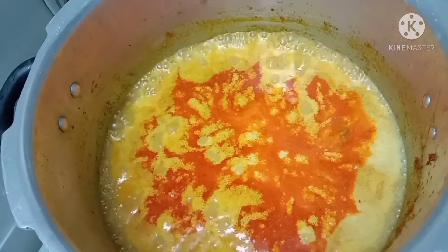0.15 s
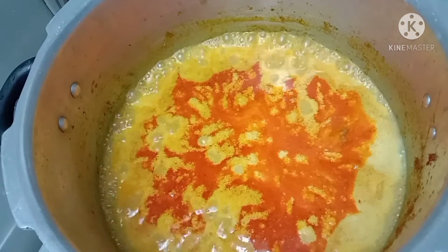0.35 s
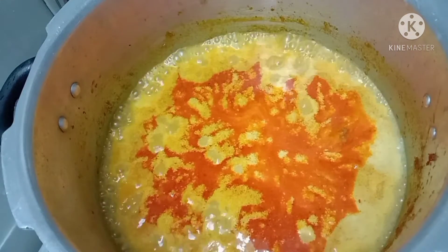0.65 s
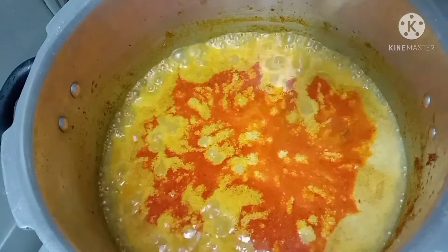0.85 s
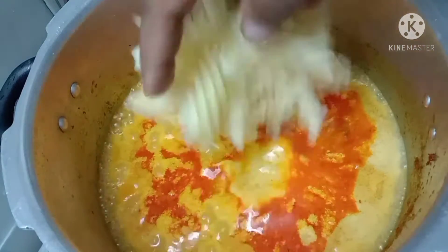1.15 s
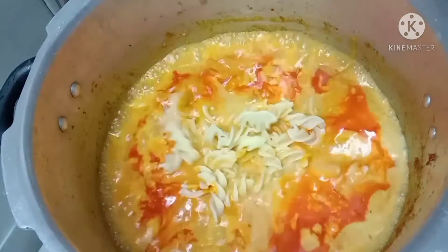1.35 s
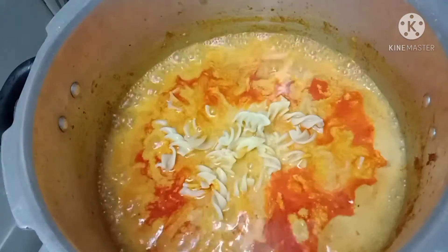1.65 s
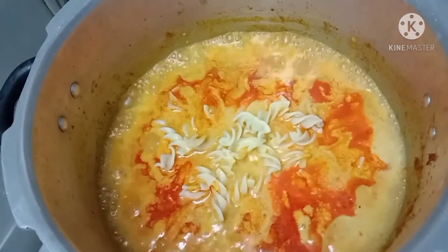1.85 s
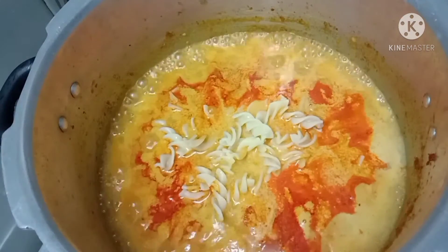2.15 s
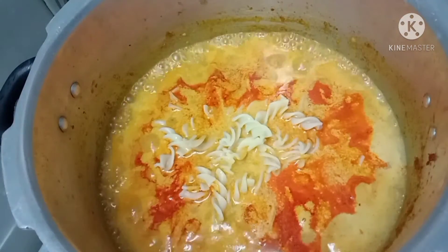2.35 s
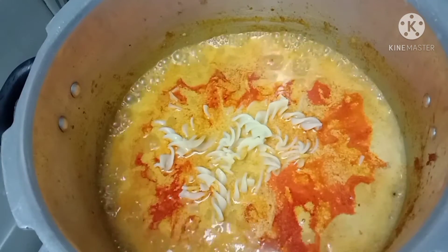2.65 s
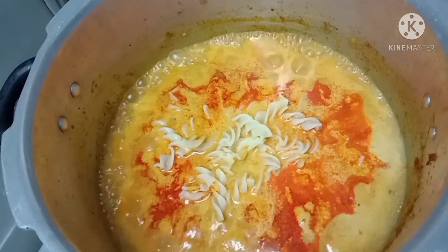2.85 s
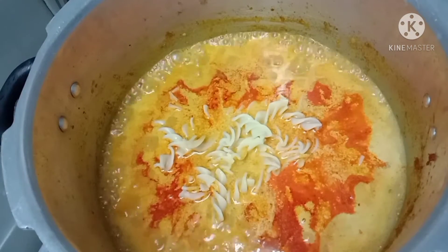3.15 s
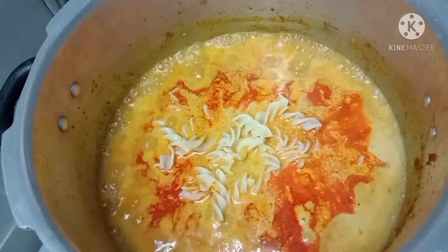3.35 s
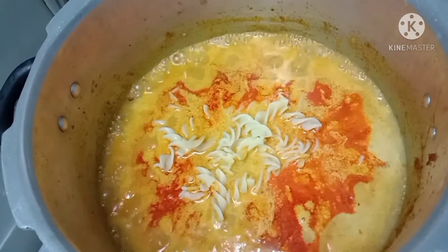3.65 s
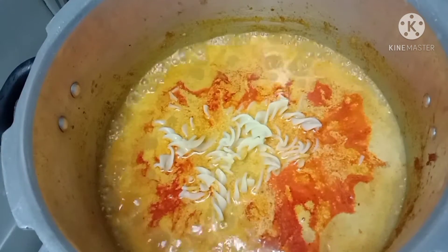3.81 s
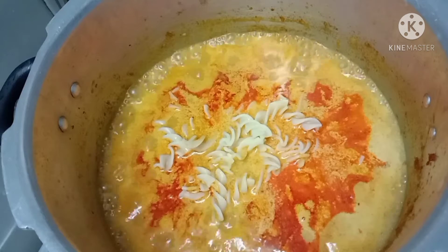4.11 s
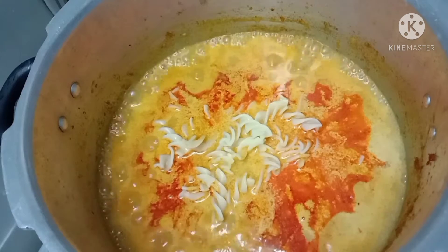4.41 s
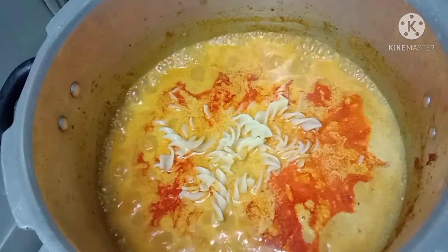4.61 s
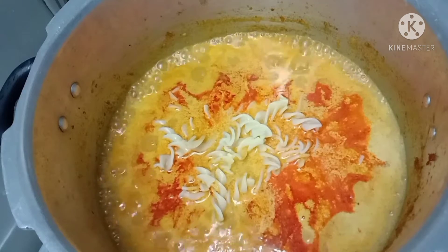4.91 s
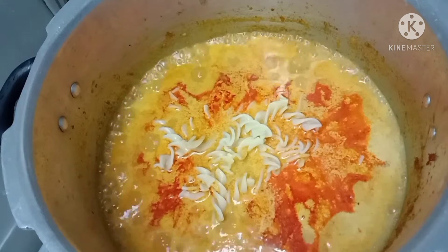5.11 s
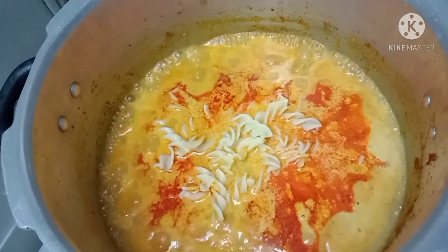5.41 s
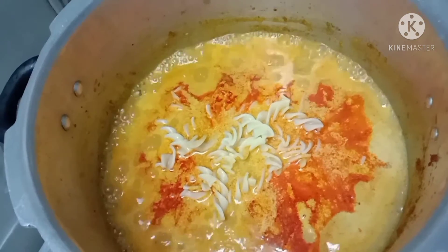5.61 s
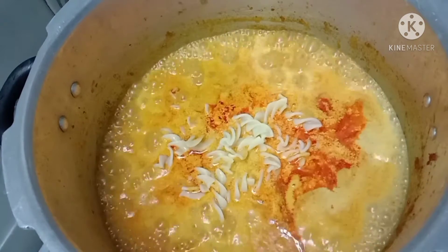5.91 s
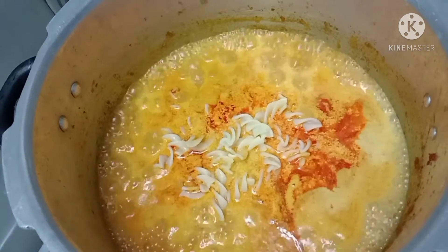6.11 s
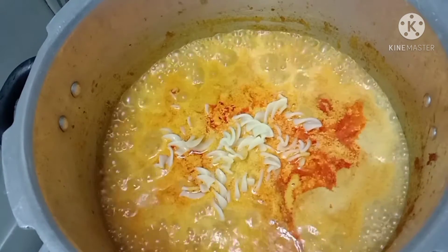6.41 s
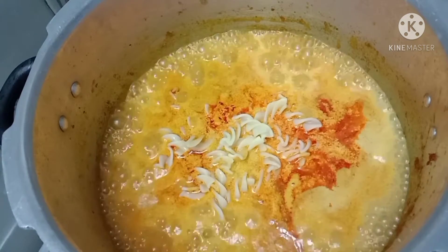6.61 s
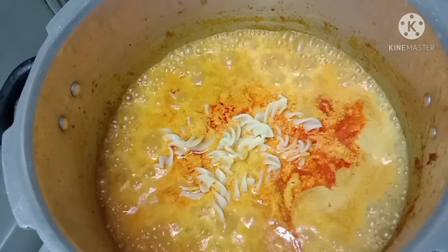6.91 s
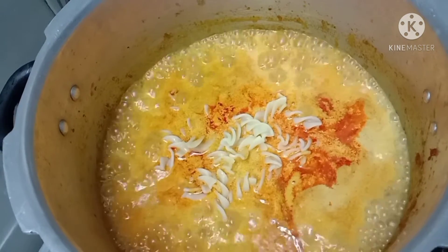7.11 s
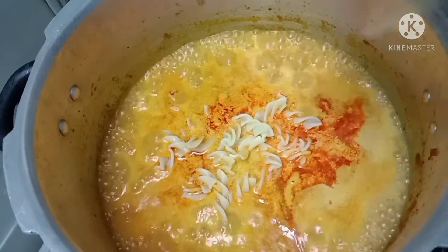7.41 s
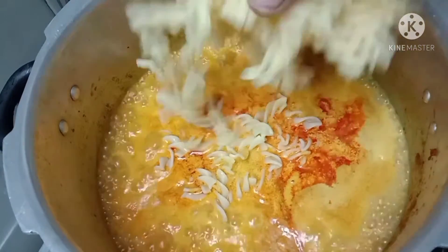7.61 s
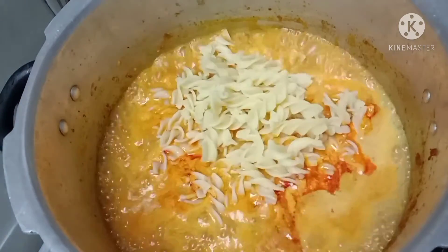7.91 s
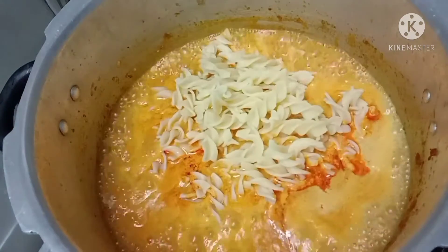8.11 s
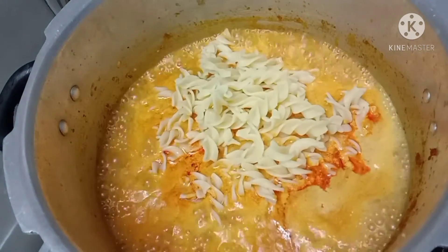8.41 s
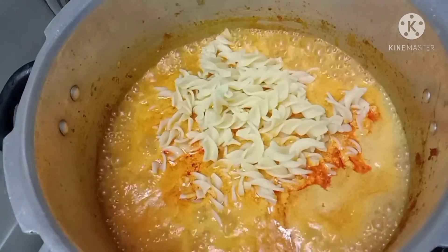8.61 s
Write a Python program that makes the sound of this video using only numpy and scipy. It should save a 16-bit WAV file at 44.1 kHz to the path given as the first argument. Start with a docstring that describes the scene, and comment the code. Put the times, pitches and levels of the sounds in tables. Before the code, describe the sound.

Quiet bubbling gravy in a metal pot, a wet pasta splash, a burst of hard metallic clanks, scraping, then another sharp plop and softer squelches.

```python
"""Pasta into simmering gravy

Thick gravy simmers in an open pressure cooker in a small kitchen: noise and random clicks through
resonances make the froth fizz and the bubbles gurgle; short soft tones make glugs and low thumps.
Cooked pasta is scraped from a vessel by tiny slips and lands in shaped noise: splashes, slops and smacks.
The vessel clanks and knocks against the cooker as decaying modes, and the hard walls answer."""
import sys
import numpy as np
from scipy import signal
from scipy.fft import rfft, irfft, next_fast_len
from scipy.io import wavfile
from scipy.ndimage import uniform_filter1d, map_coordinates

SR = 44100
rng = np.random.default_rng(int(sys.argv[2]) if len(sys.argv) > 2 else 0)


def waveform_to_disk(signal):
    """Save audio, clipped to [-1, 1], as 16-bit WAV at the path in sys.argv[1]."""
    frames = np.transpose(np.atleast_2d(signal))
    scaled = np.clip(frames, -1, 1) * 32767
    samples = np.round(scaled).astype(np.int16)
    wavfile.write(sys.argv[1], SR, samples)


N = 385875

# Levels are relative; each sound sets its own reference.
# Every width is that of one of two poles in a row, before the sound's own "broaden" factor.
# strength of the boil, in two stretches: time_s, level_db
BOIL_STRENGTH = [
    [(0.0, -66), (0.66, -66.5), (0.86, -67), (2.67, -65.5), (3.16, -68.5), (3.52, -67), (4.3, -66)],
    [(4.95, -66.5), (5.34, -58), (5.5, -63.5), (7.02, -66.5), (7.15, -63.5), (8.33, -67), (8.75, -71.5)],
]
# surges of bubbling under the rim: start_s, length_s, gurgle_db, hiss_db
BUBBLING_SURGES = [(.2, 0.22, -73, -66.5), (1.16, 0.28, -69.5, -71.5), (1.56, 0.078, -62.5, -80),
                   (1.81, 0.048, -72, -86), (2.08, 0.19, -78, -74), (2.21, 0.24, -67.5, -83),
                   (2.6, 0.11, -72, -64.5), (2.88, 0.14, -73, -99), (3.33, 0.05, -63, -78),
                   (3.72, 0.25, -72, -99), (4.76, 0.25, -70.5, -81), (5.52, 0.24, -72.5, -93),
                   (5.83, 0.084, -74, -97), (6.08, 0.38, -70.5, -85), (6.59, 0.38, -69, -98)]
SURGE_ATTACK_S, SURGE_RELEASE_S = 0.054, 0.041
# colour of the fizzing froth: frequency_hz, level_db
FROTH_COLOUR = [(2820, -38.5), (4800, -22), (5070, -18.5), (5530, -2.5), (5990, -11.5), (7650, 0.5),
                (8520, -4), (9400, -15), (11500, -13.5), (12700, -5.5), (13400, -6.5), (14900, -3),
                (15500, -6.5)]
# resonances of the air above the gravy: frequency_hz, width_hz, level_db
AIR_CAVITY = [(806.5, 13, 9), (1172, 62, 15.5), (1716, 27, 3), (2187, 150, -0.5), (2873, 26, -22.5),
              (3500, 100, -24), (3910, 24, -17), (4503, 100, -14.5), (4800, 27, -24.5), (5450, 1000, -24.5)]
# resonances of small bubbles bursting at random: frequency_hz, width_hz, level_db
CRACKLE_MODES = [(781, 49, -9), (1189, 67, 3.5), (1390, 120, -5.5), (1672, 50, -3), (2260, 380, -11.5)]
# colour of many small bubbles: frequency_hz, level_db
BUBBLE_COLOUR = [(400, -39), (750, -14), (1200, -3.5), (1700, -6), (1950, -13), (2300, -8.5), (3200, -11.5),
                 (4500, -16), (5000, -28), (5600, -14), (7000, -3.5), (10000, -42)]
# colour of the low boil, also used for squishing pasta: frequency_hz, level_db
RUMBLE_COLOUR = [(24, -47), (40, -17), (172, 0), (324, -2), (713, -10), (781, -14), (1060, -7.5),
                 (1160, -12), (1500, -10.5), (1950, -31), (3300, -120)]
# steady layers, relative to the boil
HOLLOW_DB, BRIGHT_DB, GURGLE_DB, CRACKLE_DB = -13, -12, -4, -14
LUMPY_DB, LUMPY_KNOTS_PER_S = 7.5, 17  # the hollow layer comes in uneven bursts
FLUTTER_DB, FLUTTER_KNOTS_PER_S = 1.4, 48  # the level of the fizz flutters slightly at random

# big bubbles bursting at the surface: start_s, level_db, centre_hz
BUBBLE_POPS = [(0.301, -58, 1420), (1.161, -58.5, 1110), (1.27, -54, 1200), (1.322, -54, 1220),
               (1.42, -71, 1270), (2.135, -56, 1390), (2.275, -55, 1250), (2.895, -57.5, 1800),
               (3.0, -68, 1590), (4.924, -51.5, 1348), (5.23, -50, 1400), (5.298, -48, 1480),
               (6.345, -39, 1220), (7.945, -64, 1870)]
POP_T60_S, POP_RISE_S, POP_WIDTH = 0.055, 0.0076, 0.26  # width is a share of the centre frequency

# sharp wet smacks: start_s, peak_db, centre_hz, t60_s
WET_SMACKS = [(.408, -39.5, 7960, 0.047), (.631, -47, 4800, 0.065), (.6497, -22, 5160, 0.06),
              (0.6759, -19, 5640, 0.015), (0.6952, -25.5, 3530, 0.056), (0.706, -33, 6000, 0.011),
              (0.798, -43, 5030, 0.023), (5.7521, -40.5, 7680, 0.014), (6.3447, -14, 2922, 0.028),
              (7.006, -34, 8150, 0.0181), (7.0479, -29.5, 6100, 0.024), (7.06, -39.5, 4680, 0.012),
              (7.129, -34.5, 5330, 0.033), (7.161, -27.5, 5530, 0.012)]
# the pot's walls colour smacks and spray: frequency_hz, level_db
POT_COLOUR = [(1300, 4.5), (1600, 15.5), (1930, -2.5), (2250, 2.5), (2550, -15), (2750, 0), (2950, -6.5),
              (3350, 3.5), (3780, -6.5), (4100, 1), (4700, 3.5), (5030, -0.5), (5700, -1.5), (8000, 4.5),
              (9300, -7.5), (11500, -5.5), (13000, 4.5)]

# spray thrown up by the pasta: start_s, level_db, rise_s, lowest_hz
PASTA_SPRAYS = [(0.635, -43.5, 0.015, 3810), (.651, -37, 0.024, 2480), (0.727, -54, 0.031, 3600),
                (6.35, -52, 0.055, 3000), (6.442, -45, 0.023, 900), (7.005, -55, 0.018, 3500),
                (7.038, -47, 0.021, 2160), (7.125, -48, 0.019, 3660), (7.148, -45.5, 0.013, 2660),
                (7.72, -62.5, 0.049, 2986)]
# colour of the fine droplets: frequency_hz, level_db
SPRAY_COLOUR = [(470, -53.5), (800, -40), (1230, -17), (2200, 6.5), (3400, 0), (6920, -5.5), (9090, -10.5),
                (15500, -15.5)]
# lumps of pasta sinking in: start_s, rise_s (of the slop), slop_db, squelch_db, squelch_hz
PASTA_LANDINGS = [(.662, 0.039, -66, -56, 1400), (2.64, 0.039, -59.5, -65, 840),
                  (6.345, 0.031, -45.5, -57, 1250), (6.445, 0.032, -52, -43.5, 1164),
                  (6.505, 0.031, -53, -66, 1100), (6.64, 0.042, -63.5, -77, 1170),
                  (7.02, 0.041, -65.5, -56, 1060), (7.219, 0.028, -51.5, -57, 1115),
                  (7.578, 0.019, -60, -59, 1240), (7.625, 0.028, -54, -60, 2270),
                  (8.472, 0.033, -62, -42.5, 1210), (8.52, 0.027, -63, -53.5, 790)]
SLOP_HZ = 259  # centre of the dull push of displaced gravy
SQUELCH_WIDTH, SQUELCH_RISE = 0.34, 0.77  # shares of the squelch frequency and of the slop's rise time
# every clank jolts the gravy: level relative to the clank, and at most
JOLT_DB, JOLT_MAX_DB, JOLT_RISE_S, JOLT_HZ = -21.5, -43.5, 0.01, 415

# short soft tones, singly or in runs: glugs, low thumps and the falling notes of a scrape:
# start_s, pitch_hz (before gliding), level_db, rise_s, swell_count
SOFT_TONES = [(.685, 163, -57, 0.049, 1), (.738, 285, -50.5, 0.032, 1), (.805, 239, -55.5, 0.017, 1),
              (.96, 385, -64.5, 0.06, 1), (1.02, 439, -55.5, 0.025, 1), (1.085, 423, -56.5, 0.026, 1),
              (1.175, 409, -57.5, 0.05, 2), (1.3, 1565, -62.5, 0.043, 1), (1.345, 367, -50, 0.015, 1),
              (1.455, 804, -66, .03, 1), (1.541, 399, -55, 0.029, 1), (2.604, 219, -40.5, 0.012, 1),
              (2.646, 220, -38, 0.011, 1), (2.685, 211, -55.5, 0.026, 2), (2.9575, 1180, -53.5, 0.0045, 1),
              (3.281, 420.3, -48, 0.024, 1), (3.343, 433.7, -46.5, 0.026, 2), (3.5, 256.5, -64, 0.048, 1),
              (3.68, 427, -64, 0.042, 1), (3.75, 435, -52, 0.021, 2), (3.932, 1160, -56, 0.012, 1),
              (4.371, 390, -28.5, 0.0051, 1), (4.372, 222, -41, 0.014, 1), (4.554, 165.5, -42, 0.031, 1),
              (4.995, 412, -60.5, 0.015, 2), (5.138, 1450, -42, 0.0032, 1), (5.135, 793, -55.5, 0.0083, 1),
              (5.38, 801, -53.5, 0.023, 1), (5.47, 168.8, -61.5, 0.019, 1), (5.815, 795, -60, 0.016, 1),
              (5.99, 818, -57, 0.014, 1), (6.342, 563, -42.5, 0.011, 1), (6.356, 244, -39.5, 0.015, 2),
              (6.343, 125, -49, 0.013, 1), (6.372, 400, -50, 0.011, 3), (6.44, 596, -42.5, 0.013, 1),
              (6.445, 249, -36.5, 0.018, 1), (6.515, 241, -46, .02, 1), (6.64, 512, -54.5, 0.013, 1),
              (6.685, 171, -51.5, 0.017, 3), (6.66, 248, -57.5, .015, 2), (6.744, 1522, -58, 0.021, 1),
              (7.218, 249, -50.5, 0.0074, 1), (7.24, 399, -52, 0.011, 1), (7.27, 996, -56.5, 0.023, 1),
              (7.33, 1530, -52, 0.025, 1), (7.375, 1424, -55, 0.029, 1), (7.42, 1314, -51, 0.021, 1),
              (7.585, 653, -58, .018, 2), (7.59, 171.2, -50, 0.045, 1), (7.635, 265.5, -53, 0.012, 2),
              (8.165, 794, -61, 0.022, 1), (8.394, 1528, -54.5, 0.016, 1), (8.522, 259, -50, 0.017, 1)]
SWELL_GAP, SWELL_LOSS_DB = 2.4, 4.5  # the next swell follows after this many rise times, this much weaker

# a wet spot sizzles on the hot wall
SIZZLE_START_S, SIZZLE_LENGTH_S = 2.07, 0.45
SIZZLE_DB, SIZZLE_HZ, SIZZLE_WIDTH_HZ = -72, 3860, 99

# metal on the cooker's rim: start_s, level_db (of the whole blow), ring_db, tick_db (both on top of it)
RIM_CLANKS = [(4.3717, -13.5, -17.5, -5.5), (4.421, -22.5, -10.5, -11), (4.442, -27.5, -3.5, -17),
              (4.458, -36.5, 6, -29), (4.5225, -10, 4.5, -7), (4.556, -25, -7.5, -21.5),
              (4.5761, -7, 3, -10.5), (4.6, -11.5, -0.5, -22), (4.613, -18, 3.5, -30.5),
              (4.627, -24, 2, -32), (4.637, -30, 0, -31), (4.666, -35.5, 2.5, -28), (4.708, -34.5, 5, -32),
              (4.81, -49, 13.5, -30)]
# the cooker's ringing modes: frequency_hz, level_db
COOKER_MODES = [(1020, -43.5), (1054, -43.5), (1095, -43.5), (1132, -46), (1185, -44), (1209, -42.5),
                (1244, -44.5), (1393, -47), (1550, -46.5), (1780, -52), (2919, -44), (3005, -47.5),
                (3268, -43), (3348, -49.5), (3569, -53.5), (3955, -46.5), (4215, -53.5), (4440, -60),
                (4512, -47.5), (5390, -48), (5922, -50), (6298, -50.5), (6767, -50.5), (7580, -52.5),
                (7930, -55), (8909, -66), (14005, -57)]
# colour of the metal contact itself: frequency_hz, level_db
CLASH_COLOUR = [(120, -73), (200, -36.5), (450, -23.5), (702, -22.5), (1190, -17.5), (1350, -14.5),
                (1800, -19.5), (2400, -22), (2960, -17.5), (3610, -21.5), (4030, -18), (4920, -25.5),
                (6130, -20.5), (8500, -33), (13600, -41), (15500, -37)]
# colour of edge on edge: frequency_hz, level_db
TICK_COLOUR = [(2000, -56.5), (7000, -3), (10000, -9.5), (13000, -1), (15500, -2)]
BUZZ_WIDTH_HZ = 37  # the chattering rim blurs the cooker's low modes
# every blow flexes the cooker's wall, which the gravy damps at once
WALL_HZ, WALL_T60_S, WALL_DB = 1208, 0.047, 1.5

# the vessel drags along the rim: start_s, length_s, level_db
RIM_DRAGS = [(4.42, .05, -40.5), (6.351, 0.11, -52.5), (6.45, 0.051, -47), (8.461, 0.031, -46.5)]
# resonances of the hand-held vessel: frequency_hz, width_hz, level_db
VESSEL_MODES = [(705, 30, 8), (1243, 16.8, 9.5), (2120, 42, 4), (2402, 55, 6), (3263, 19, -3.5),
                (4215, 71, 0), (6930, 200, -11.5)]

# strokes scraping pasta along its vessel: start_s, length_s, body_db, rasp_db, main_resonance_hz, rise_s
SCRAPE_STROKES = [(5.065, 0.074, -56, -60.5, 1368, 0.0037), (5.147, 0.085, -60.5, -56.5, 1367, .015),
                  (5.212, 0.1, -51.5, -64, 1347, 0.038), (5.335, .04, -60, -65, 1340, .02),
                  (5.379, 0.072, -56.5, -57, 1362, 0.025), (5.452, 0.088, -54.5, -64.5, 1332, 0.032),
                  (5.962, 0.053, -53.5, -68, 1290, 0.0054), (6.019, .075, -57.5, -66, 1278, .015),
                  (6.978, 0.1126, -53, -59, 1328, 0.064), (7.334, 0.12, -59.5, -67, 1337, 0.019),
                  (7.46, 0.057, -59.5, -86, 1292, 0.031), (7.661, 0.09, -54.5, -66.5, 1278, 0.017),
                  (7.746, 0.11, -51.5, -60, 1300, 0.039), (7.997, 0.067, -57, -60.5, 1283, .032)]
# low modes of the scraped vessel: frequency_hz (before bending), width_hz, level_db
SCRAPED_MODES = [(796, 54, -3.5), (1193, 28, 3), (1283, 79, 11), (1538, 29.5, 7), (1680, 64, -20),
                 (2347, 68, -4)]
# high modes of the scraped vessel: frequency_hz, width_hz, level_db
RASP_MODES = [(3380, 68, -3), (4020, 38, 1.5), (4530, 70, 0), (5400, 150, -4), (5930, 46, -2),
              (6500, 84, -1), (8380, 240, -11.5)]
SCRAPED_HZ = 1301  # the main resonance at which the low modes are unbent
STROKE_SAG = 0.019  # the resonance starts a stroke this share higher and ends it as much lower
STROKE_RELEASE_S = 0.021

# damped knocks of the vessel: start_s, peak_db, touch_count
VESSEL_KNOCKS = [(5.066, -57, 1), (6.347, -42, 2), (6.45, -41, 2), (6.492, -41, 1), (6.877, -56.5, 1),
                 (8.386, -46, 1), (8.4591, -29.5, 1), (8.476, -31, 1), (8.4925, -31, 1), (8.546, -51, 1)]
CHATTER_GAP_S = 0.0158  # from one touch of a knock to the next

# sticky clumps of pasta letting go of the vessel: start_s, peak_db
STICKY_CLUMPS = [(7.584, -47), (7.595, -47), (7.611, -46), (7.638, -57), (7.671, -48), (7.694, -54),
                 (7.908, -57), (8.399, -57.5)]
CLUMP_HZ, CLUMP_WIDTH_HZ, CLUMP_T60_S = 2315, 240, 0.03

# how long the kitchen rings: frequency_hz, t60_s
KITCHEN_DECAY = [(100, 0.22), (500, 0.4), (1200, 0.47), (3400, 0.46), (8000, 0.38), (14000, 0.23)]
TOP_HZ = 15600  # the microphone's band limit


def amp(db):
    """Turn decibels into gain."""
    return 10 ** (np.asarray(db) / 20)


def unit(x):
    """Bring x to an average (rms) level of 1."""
    return x / np.sqrt(np.mean(x ** 2) + 1e-20)


def along(points, hz):
    """Read (frequency, value) points on a logarithmic frequency axis."""
    f, v = np.transpose(points)
    return np.interp(np.log(hz + 1), np.log(f + 1), v)


def filtered(x, response):
    """Multiply the spectrum of x by a response that depends on frequency."""
    m = next_fast_len(len(x) + SR // 4)
    spectrum = rfft(x, m) * response(np.fft.rfftfreq(m, 1 / SR))
    return irfft(spectrum, m)[:len(x)]


def coloured(x, spectrum):
    """Shape x with a (frequency, dB) curve, at rms 1."""
    return unit(filtered(x, lambda hz: amp(along(spectrum, hz))))


def resonance(f, hz, width):
    """A steep-sided resonance: two like poles in a row."""
    return (1j * f * width / (hz * hz - f * f + 1j * f * width)) ** 2


def resonate(x, modes, broaden):
    """Send x through a set of steady resonances, at rms 1."""
    def response(f):
        return sum(amp(db) * resonance(f, hz, broaden * width) for hz, width, db in modes)
    return unit(filtered(x, response))


def wobble(rate):
    """A smooth random curve, rate knots a second."""
    knots = rng.standard_normal(int(N * rate / SR) + 4)
    coarse = np.arange(0, N, 64)
    smooth = map_coordinates(knots, [coarse * rate / SR])
    return np.interp(np.arange(N), coarse, smooth)


def wander(x, modes, broaden, drift_db, rate):
    """As the source shifts about, it drives each resonance now more, now less."""
    total = np.zeros(N)
    for hz, width, db in modes:
        ringing = filtered(x, lambda f: resonance(f, hz, broaden * width))
        total += amp(db + drift_db * wobble(rate)) * ringing
    return unit(total)


def grains(rate, spread_db, n=N):
    """Random clicks, rate a second on average, whose sizes vary in decibels."""
    hits = rng.random(n) < rate / SR
    signs = rng.choice([-1, 1], n)
    sizes = amp(spread_db * np.clip(rng.standard_normal(n), -2, 2))
    return unit(hits * signs * sizes)


def second():
    """The one-second time axis of one event."""
    return np.arange(SR) / SR


def swell(rise):
    """A soft push that peaks at 1 after rise seconds."""
    u = second() / rise
    return (u * np.exp(1 - u)) ** 2


def fade(t60):
    """A decay of 60 dB in t60 seconds."""
    return np.exp(-np.log(1000) * second() / t60)


def held(length, attack, release):
    """A gain that rises, holds and dies away."""
    t = second()
    return np.minimum(t / attack, 1) * np.exp(-np.maximum(t - length, 0) / release)


def curve(s, values):
    """One value per sample, on straight lines between the points."""
    return np.interp(np.arange(N) / SR, s, values)


def add(track, s, x):
    """Mix x into the track at s seconds."""
    start = max(round(s * SR), 0)
    track[start:start + len(x)] += x[:max(N - start, 0)]


def efforts(rows, attacks, release):
    """Turn rows of start, length, low dB and high dB into two gains per sample."""
    low, high = np.zeros(N), np.zeros(N)
    for (s, length, low_db, high_db, *_), attack in zip(rows, np.broadcast_to(attacks, len(rows))):
        shape = held(length, attack, release)
        add(low, s, amp(low_db) * shape)
        add(high, s, amp(high_db) * shape)
    return low, high


def bubbles(patchy_db):
    """Countless small bubbles merge into a gurgle; clusters of like size come and go."""
    z = signal.stft(grains(rate=4000, spread_db=3.5), nperseg=512)[2]
    clusters = uniform_filter1d(rng.standard_normal(z.shape), size=3, axis=0)  # alike in pitch
    clusters = uniform_filter1d(clusters, size=8, axis=1)  # and in time
    patchy = signal.istft(z * amp(patchy_db * unit(clusters)), nperseg=512)[1][:N]
    return coloured(patchy, BUBBLE_COLOUR)


def simmer():
    """Froth fizzes, bubbles gurgle, crackle and ring the air in the pot, and the boil rumbles below."""
    boil = amp(curve(*np.concatenate(BOIL_STRENGTH).T))
    low, high = efforts(BUBBLING_SURGES, SURGE_ATTACK_S, SURGE_RELEASE_S)
    fizz = coloured(rng.standard_normal(N) + amp(-3.5) * grains(rate=91, spread_db=6.5), FROTH_COLOUR)

    bursts = grains(rate=1700, spread_db=2.0)
    low_air = [mode for mode in AIR_CAVITY if mode[0] < 2500]
    high_air = [mode for mode in AIR_CAVITY if mode[0] >= 2500]
    hollow = wander(bursts, low_air, broaden=1.4, drift_db=3.5, rate=9)
    bright = wander(bursts, high_air, broaden=2.1, drift_db=4.0, rate=14)

    gurgle_gain = amp(GURGLE_DB) * boil + amp(-46) * low + amp(-15) * high
    gurgle = gurgle_gain * bubbles(patchy_db=7.5)
    crackle_gain = amp(CRACKLE_DB) * boil + amp(-13.5) * low
    crackle = crackle_gain * resonate(grains(rate=280, spread_db=5.0), CRACKLE_MODES, broaden=0.94)
    rumble = coloured(rng.standard_normal(N), RUMBLE_COLOUR) * amp(0.16 * wobble(1.6))

    steady = amp(FLUTTER_DB * wobble(FLUTTER_KNOTS_PER_S)) * fizz
    steady += amp(HOLLOW_DB + LUMPY_DB * wobble(LUMPY_KNOTS_PER_S)) * hollow
    steady += amp(BRIGHT_DB) * bright
    return boil * steady + low * hollow + high * bright + gurgle + crackle + amp(-72) * rumble


def pops():
    """Big bubbles burst and briefly ring the air in the pot."""
    out = np.zeros(N)
    for s, db, hz in BUBBLE_POPS:
        ring = resonate(rng.standard_normal(SR), [(hz, POP_WIDTH * hz, 0)], broaden=0.89)
        rise = np.minimum(second() / POP_RISE_S, 1)
        add(out, s, amp(db + 5.5) * ring * fade(POP_T60_S) * rise)
    return out


def smacks(below_db=-24, above_db=-13):
    """Wet surfaces meet and part with a short broad snap."""
    out = np.zeros(N)
    for s, db, hz, t60 in WET_SMACKS:
        band = [(hz / 20, -60), (hz / 1.81, below_db), (hz / 1.42, -2),
                (hz * 1.02, 0), (hz * 2, above_db), (hz * 4, -24)]
        noise = coloured(rng.standard_normal(SR), band)
        snap = coloured(noise, POT_COLOUR) * fade(t60)
        add(out, s, amp(db) * snap / np.abs(snap).max())
    return out


def slop(hz, rise):
    """A dull push of displaced gravy: swelling noise in a low band."""
    band = [(hz / 12, -23), (hz / 4, -13), (hz / 3.38, -1), (hz * 2.44, 0), (hz * 3, -13), (hz * 12, -55)]
    return swell(rise) * coloured(rng.standard_normal(SR), band)


def splashes():
    """Pasta pushes gravy aside, squelches and throws up fine droplets; clanks jolt the gravy too."""
    out = np.zeros(N)
    for s, rise, slop_db, squelch_db, hz in PASTA_LANDINGS:
        clicks = grains(rate=1500, spread_db=-0.5, n=SR)
        squelch = resonate(clicks, [(hz, SQUELCH_WIDTH * hz, 0)], broaden=0.67)
        add(out, s, amp(slop_db) * slop(SLOP_HZ, rise))
        add(out, s, amp(squelch_db) * swell(SQUELCH_RISE * rise) * squelch)
    for s, db, *_ in RIM_CLANKS:
        add(out, s, amp(min(db + JOLT_DB, JOLT_MAX_DB)) * slop(JOLT_HZ, JOLT_RISE_S))
    for s, db, rise, lowest_hz in PASTA_SPRAYS:
        droplets = coloured(grains(rate=7000, spread_db=6.5, n=SR), SPRAY_COLOUR)
        droplets = filtered(droplets, lambda hz: 1 - 1 / (1 + (hz / lowest_hz) ** 8))  # cut the lows
        add(out, s, amp(db) * swell(rise) * coloured(droplets, POT_COLOUR))
    return out


def soft_tones(glide=0.04, tremble=0.35, waver=0.7, slim=1.11):
    """Sine tones swell once or in a run, creep up in pitch and tremble: glugs, thumps and scrape notes."""
    out, t = np.zeros(N), second()
    for s, hz, db, rise, count in SOFT_TONES:
        run = np.zeros(N)
        for k in range(round(count)):
            add(run, k * SWELL_GAP * rise, amp(db - k * SWELL_LOSS_DB) * swell(rise) ** slim)
        creep = np.tanh(t / (round(count) * rise) - 1)
        pitch = hz * (1 + glide * creep * min(1, 300 / hz))  # above 300 Hz the share of glide shrinks
        phase = 2 * np.pi * np.cumsum(pitch) / SR + waver * wobble(54)[:SR]
        add(out, s, run[:SR] * np.sin(phase))
    return out * (1 + tremble * wobble(90))


def sizzle(attack=0.0077, release=0.029):
    """Gravy boils off the hot wall with a thin, narrow hiss."""
    out = np.zeros(N)
    hiss = resonate(rng.standard_normal(SR), [(SIZZLE_HZ, SIZZLE_WIDTH_HZ, 0)], broaden=0.69)
    add(out, SIZZLE_START_S, amp(SIZZLE_DB) * held(SIZZLE_LENGTH_S, attack, release) * hiss)
    return out


def clanks(clash_t60=0.054, ring_t60=0.052, linger_t60=0.55, linger_db=-25, damping=0.6,
           tick_t60=0.03, chatter_t60=0.45, chatter_db=-18, buzz_db=-27):
    """The full cooker soon loses most of its ring; its loose rim chatters on and buzzes the low modes."""
    out, t = np.zeros(N), second()
    low_modes = [(hz, BUZZ_WIDTH_HZ, level) for hz, level in COOKER_MODES if hz < 1600]
    wall = amp(WALL_DB) * np.sin(2 * np.pi * WALL_HZ * t) * fade(WALL_T60_S)
    for s, db, ring_db, tick_db in RIM_CLANKS:
        ring = np.zeros(SR)
        for hz, level in COOKER_MODES:
            # a quick loss, then a faint ring that dies sooner at high pitch
            decay = fade(ring_t60) + amp(linger_db) * fade(linger_t60 * (1200 / hz) ** damping)
            strength = amp(level + 34 + rng.normal(0, 2.0))
            ring += strength * decay * np.sin(2 * np.pi * (hz * t + rng.random()))
        clash = coloured(rng.standard_normal(SR), CLASH_COLOUR) * fade(clash_t60)
        touches = grains(rate=700, spread_db=3.0, n=SR)
        chatter = amp(chatter_db) * coloured(touches, CLASH_COLOUR) * fade(chatter_t60)
        buzz = amp(buzz_db) * resonate(touches, low_modes, broaden=0.95) * fade(linger_t60)
        tick = coloured(rng.standard_normal(SR), TICK_COLOUR) * fade(tick_t60)
        blow = clash + chatter + buzz + amp(ring_db) * (wall + ring) + amp(tick_db) * tick
        add(out, s, amp(db - 8) * blow * (1 - fade(0.0033)))  # the last factor softens the onset
    return out


def drags(attack=0.0066, release=0.0038):
    """The vessel slips along the rim in a dense judder that rings its own resonances."""
    out = np.zeros(N)
    for s, length, db in RIM_DRAGS:
        judder = resonate(grains(rate=1800, spread_db=0.0, n=SR), VESSEL_MODES, broaden=5.5)
        add(out, s, amp(db) * held(length, attack, release) * judder)
    return out


def scrapes(uneven_db=0.9):
    """Tiny slips ring the vessel's low modes and rasp in its high ones; the wet pasta squishes."""
    start, length, _, _, pitch, rise = np.transpose(SCRAPE_STROKES)
    body, rasp = efforts(SCRAPE_STROKES, rise, STROKE_RELEASE_S)
    slips = grains(rate=2000, spread_db=2.0)
    groan = wander(slips, SCRAPED_MODES, broaden=1.4, drift_db=2.5, rate=25)

    # the shifting load bends the modes: the groan is read faster or slower
    times = np.sort(np.ravel([start, start + length], "F"))
    pitches = np.outer(pitch, [1 + STROKE_SAG, 1 - STROKE_SAG]).ravel()
    position = np.cumsum(curve(times, pitches) / SCRAPED_HZ) % N
    groan = np.interp(position, np.arange(N), groan)

    hiss = wander(slips, RASP_MODES, broaden=2.86, drift_db=4.0, rate=16)
    squish = amp(-14.5) * bubbles(patchy_db=6.0) + amp(-19.5) * coloured(slips, RUMBLE_COLOUR)
    return body * amp(uneven_db * wobble(70)) * (groan + squish) + rasp * hiss


def knocks(touch_t60=0.008, rub_t60=0.059):
    """A sharp touch and a brief rub ring the vessel, which the hand damps at once; some knocks chatter."""
    out = np.zeros(N)
    for s, db, count in VESSEL_KNOCKS:
        for k in range(round(count)):
            force = rng.standard_normal(SR) * (fade(touch_t60) + 0.4 * fade(rub_t60))
            knock = resonate(force, VESSEL_MODES, broaden=4.7)
            add(out, s + k * CHATTER_GAP_S, amp(db) * knock / np.abs(knock).max())
    return out


def clumps():
    """Each clump that comes unstuck rings one resonance of the vessel in a narrow click."""
    out = np.zeros(N)
    for s, db in STICKY_CLUMPS:
        force = rng.standard_normal(SR) * fade(CLUMP_T60_S)
        click = resonate(force, [(CLUMP_HZ, CLUMP_WIDTH_HZ, 0)], broaden=0.64)
        add(out, s, amp(db) * click / np.abs(click).max())
    return out


def kitchen(x):
    """The walls' answer: a noise tail in which each frequency dies at its own speed."""
    hz, t, z = signal.stft(rng.standard_normal(SR), SR, nperseg=256)
    decay = amp(-60 * t / along(KITCHEN_DECAY, hz)[:, None])
    tail = signal.istft(z * decay, SR, nperseg=256)[1][:SR]
    tail = tail * (1 - fade(0.023))  # the answer builds up gently
    return signal.fftconvolve(x, tail / np.linalg.norm(tail))[:N]


def scene():
    """Mix all the sounds in and just above the pot; the simmer and sizzle get no answer from the walls."""
    low = soft_tones() + pops()
    wet = splashes() + smacks()
    metal = clanks()
    vessel = knocks() + drags() + clumps() + scrapes()
    room = kitchen(amp(-11) * metal)
    room += kitchen(amp(-16.5) * wet + amp(-22.5) * vessel + amp(-8) * low)
    return (metal + wet + vessel + low + room + simmer() + sizzle())[None]


def record(dry):
    """The microphone thins the deepest bass and keeps nothing above its band limit."""
    def response(hz):
        bass_cut = (1j * hz / (1j * hz + 25)) ** 2
        return (hz < TOP_HZ) * bass_cut
    return filtered(dry[0], response)[None]


dry = scene()
out = record(dry)
waveform_to_disk(out)
```